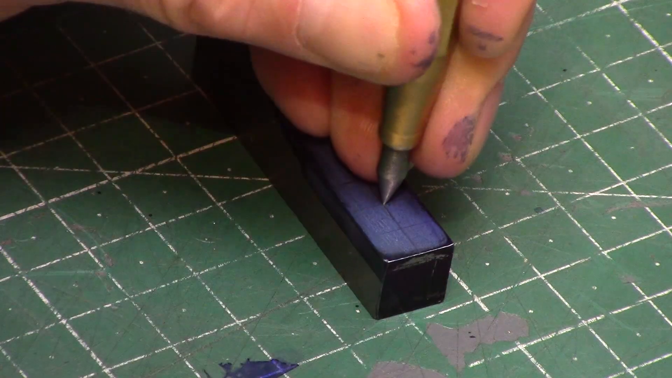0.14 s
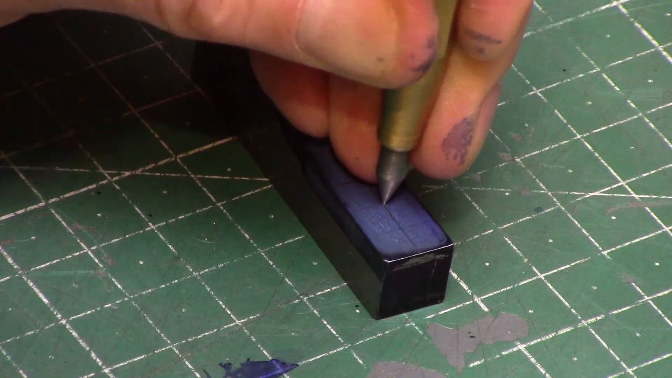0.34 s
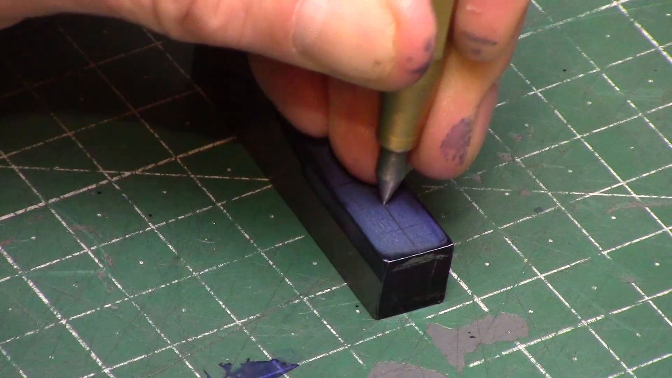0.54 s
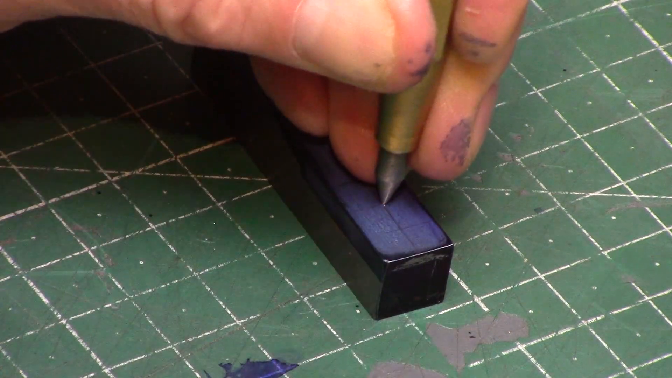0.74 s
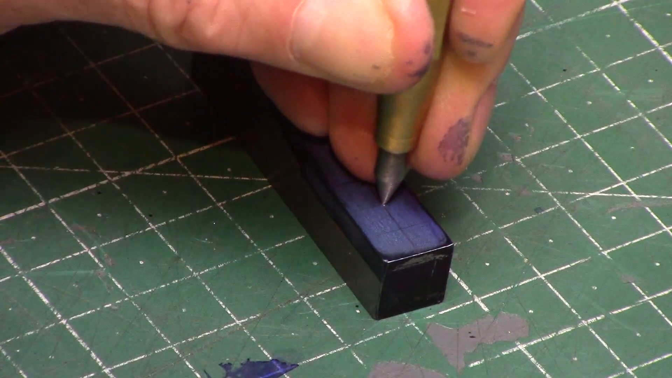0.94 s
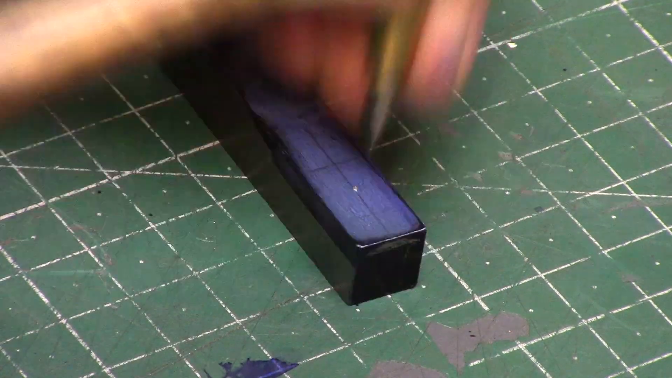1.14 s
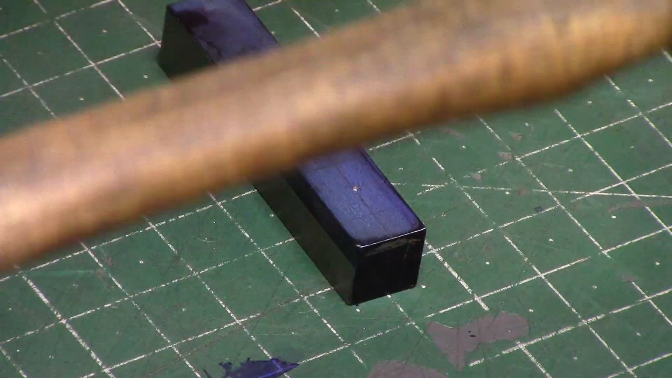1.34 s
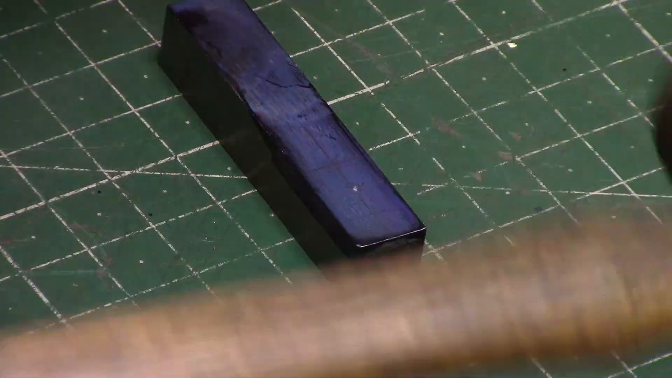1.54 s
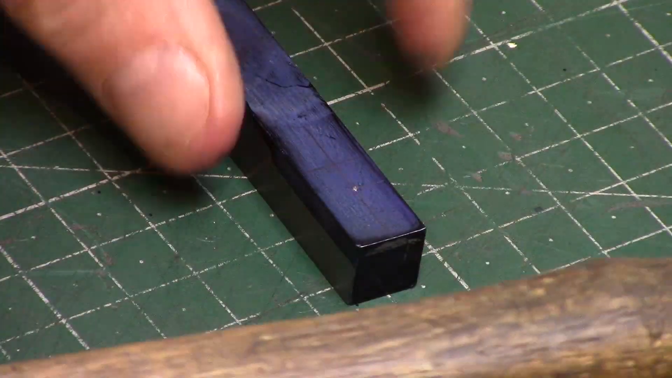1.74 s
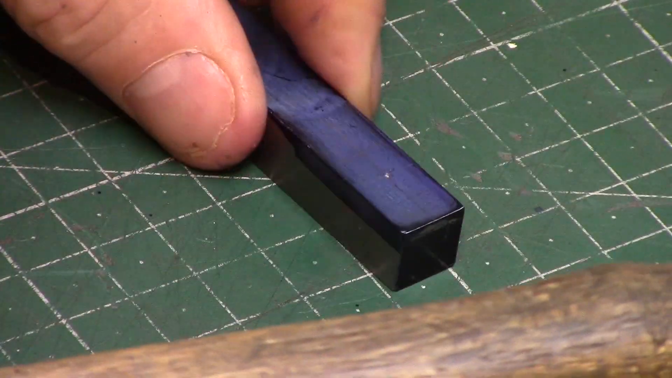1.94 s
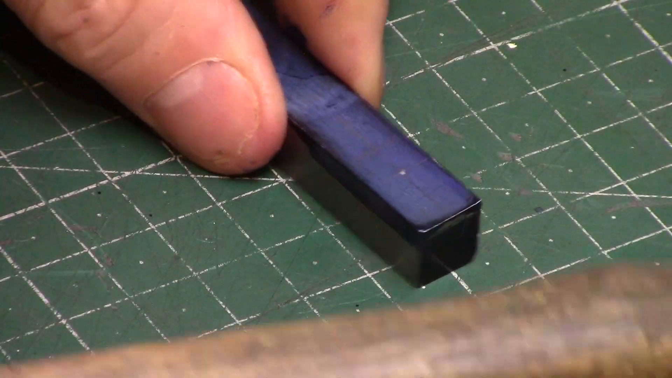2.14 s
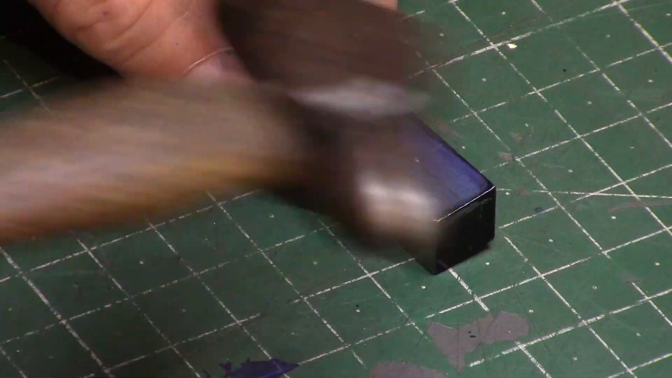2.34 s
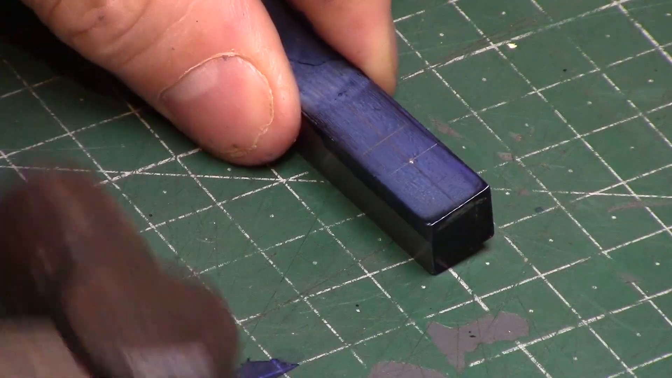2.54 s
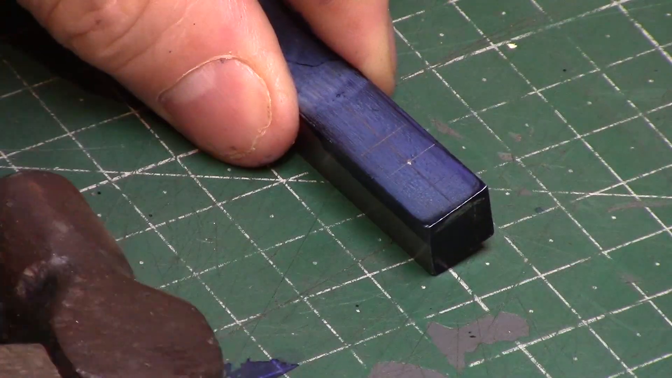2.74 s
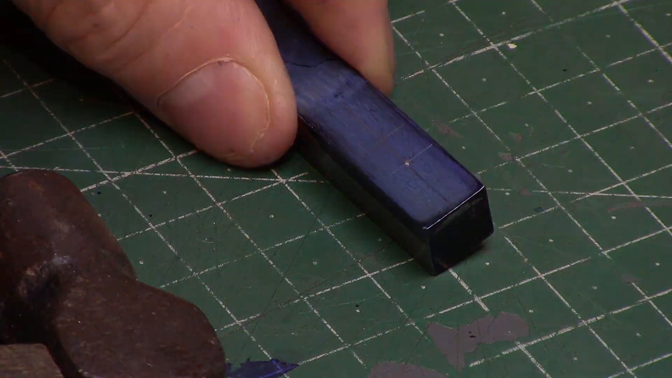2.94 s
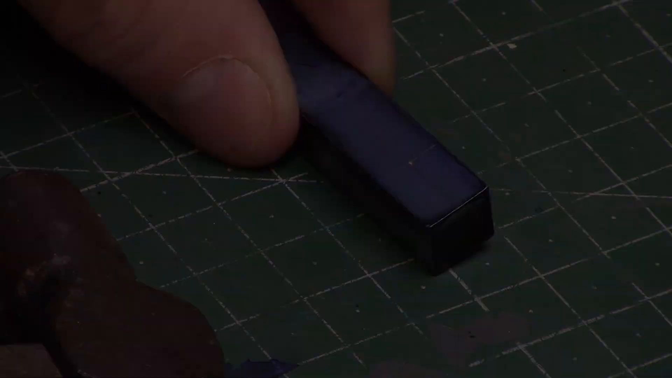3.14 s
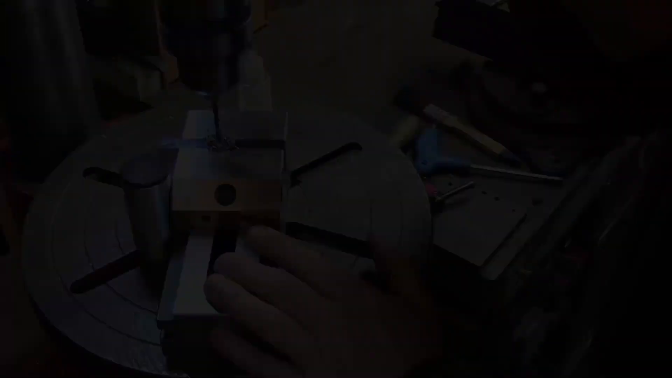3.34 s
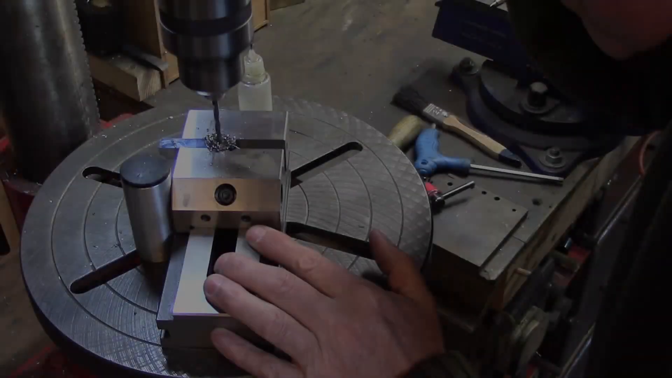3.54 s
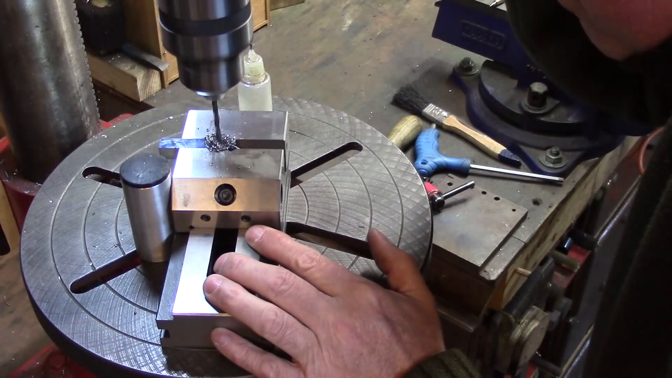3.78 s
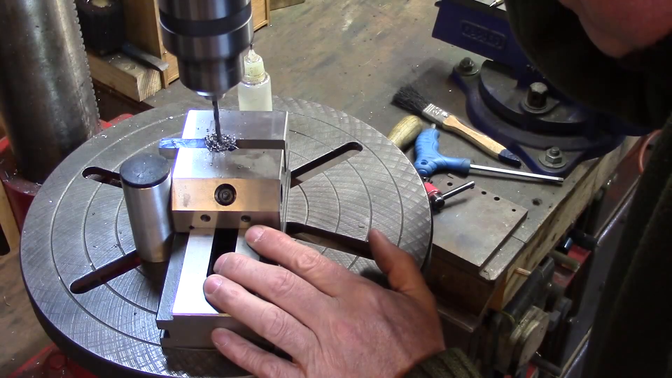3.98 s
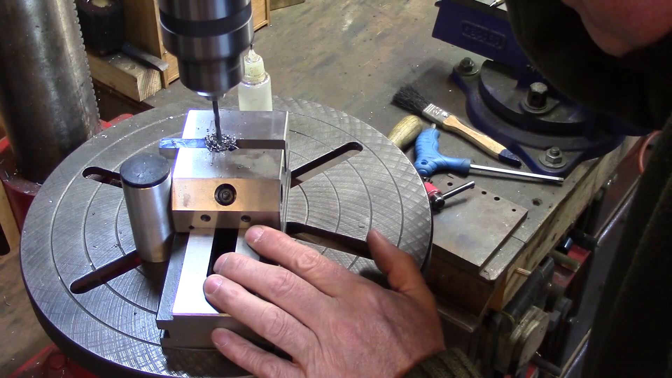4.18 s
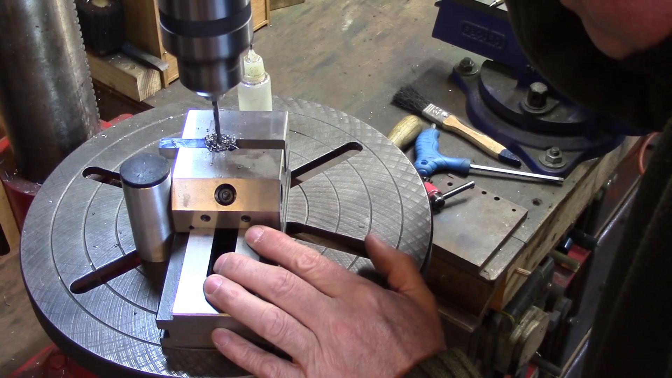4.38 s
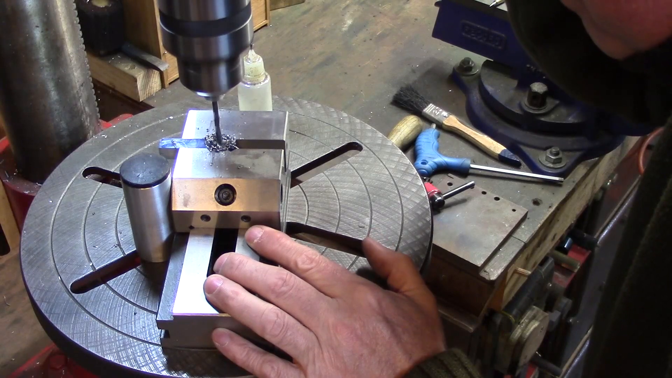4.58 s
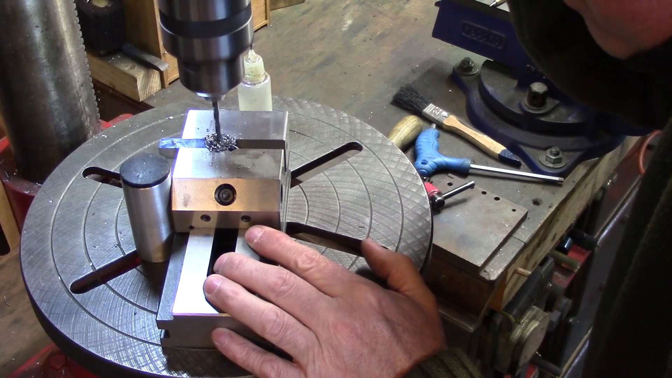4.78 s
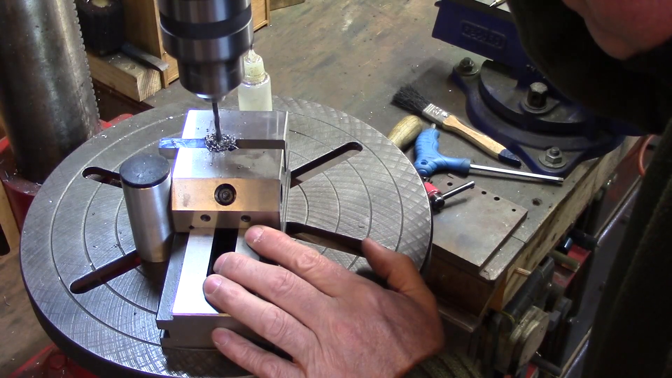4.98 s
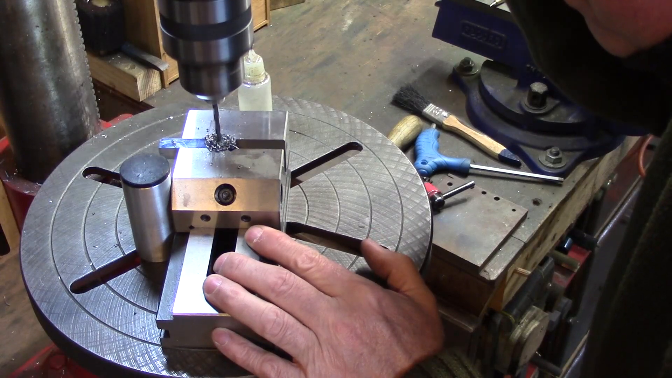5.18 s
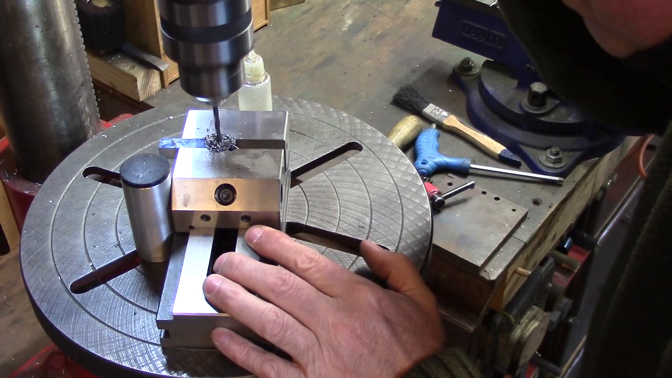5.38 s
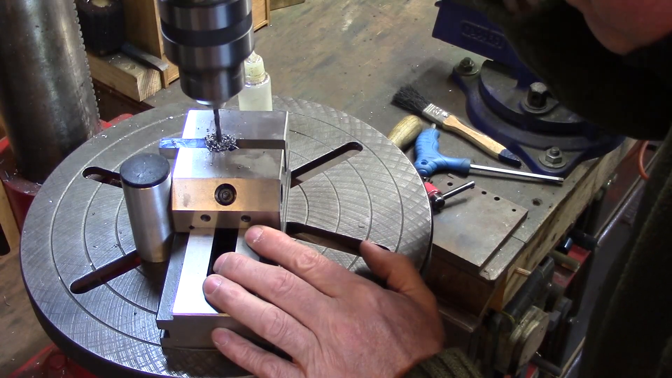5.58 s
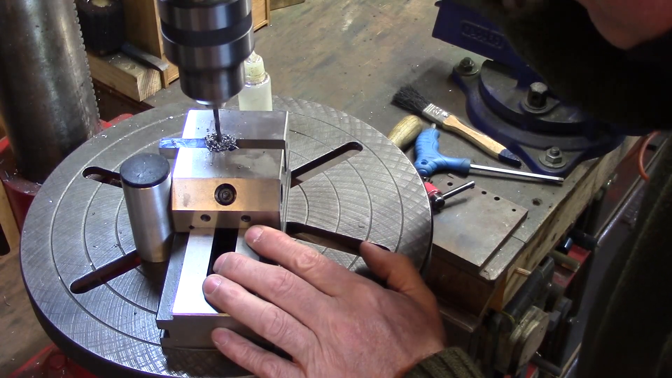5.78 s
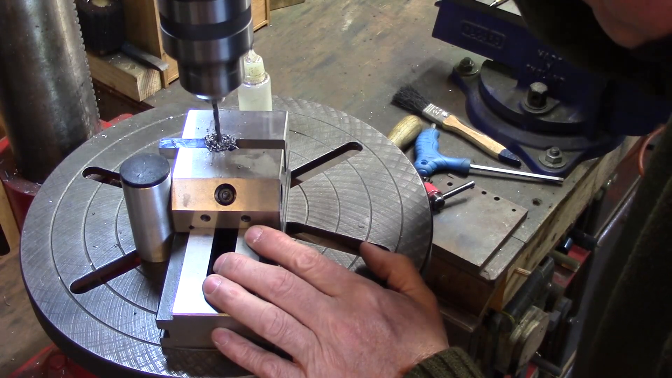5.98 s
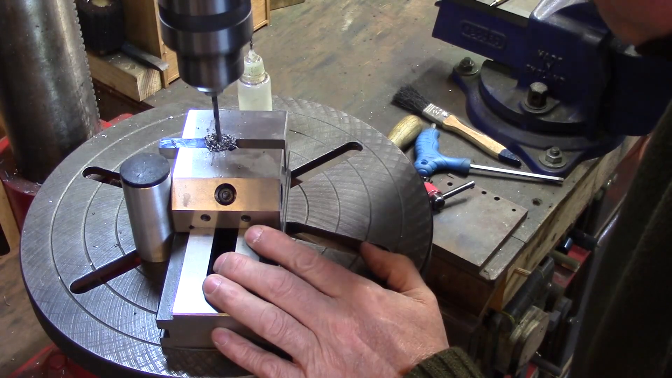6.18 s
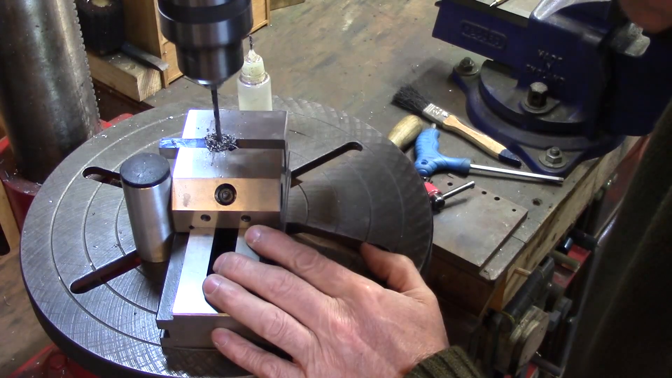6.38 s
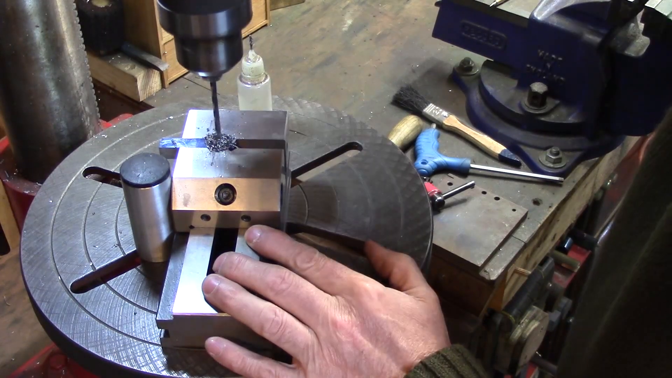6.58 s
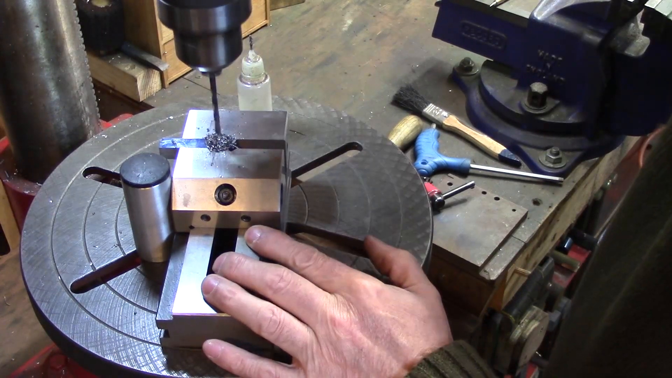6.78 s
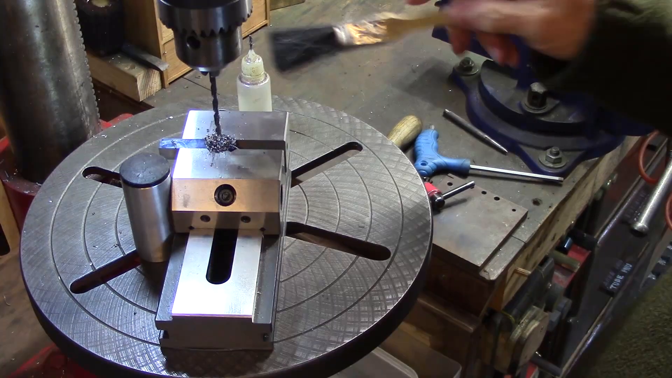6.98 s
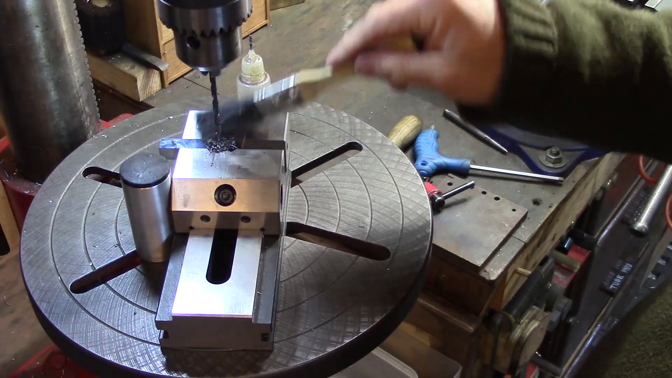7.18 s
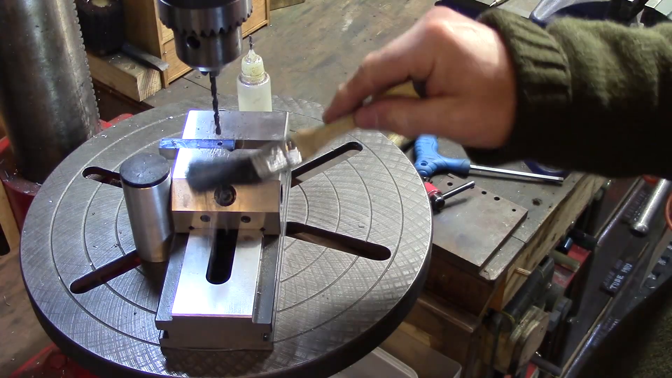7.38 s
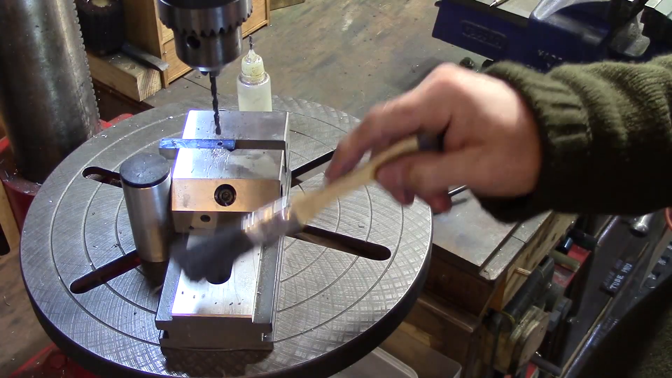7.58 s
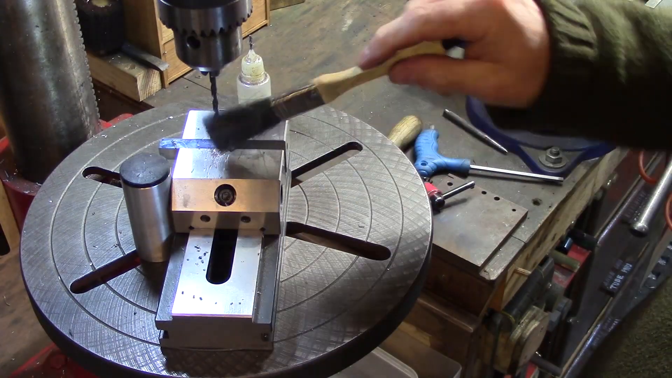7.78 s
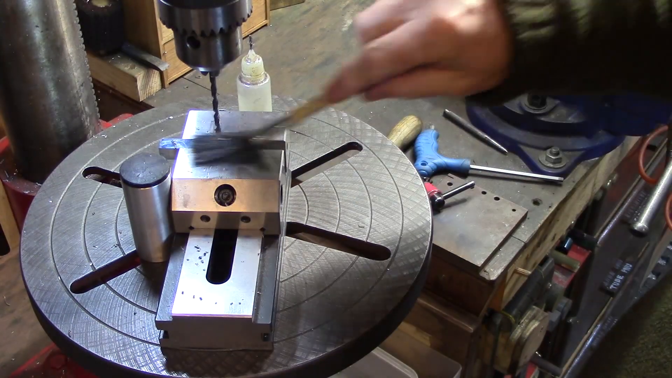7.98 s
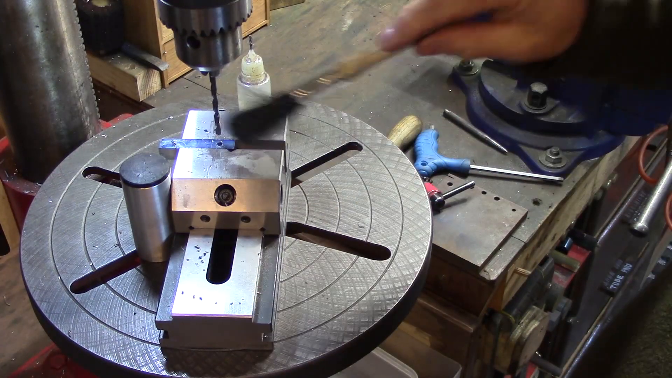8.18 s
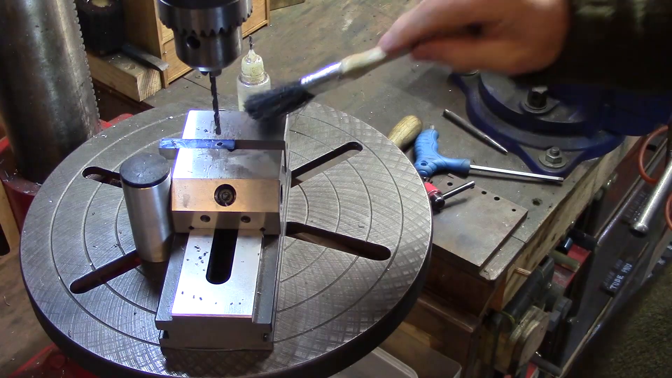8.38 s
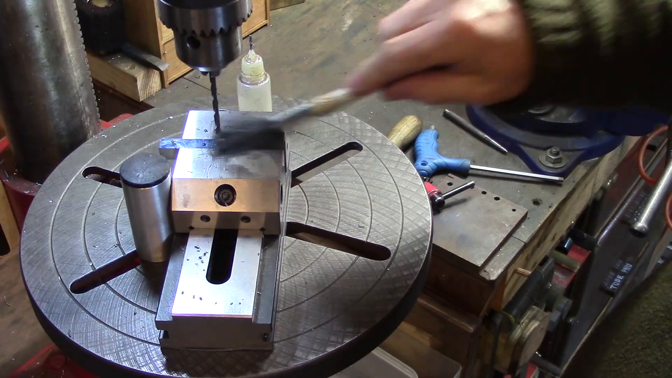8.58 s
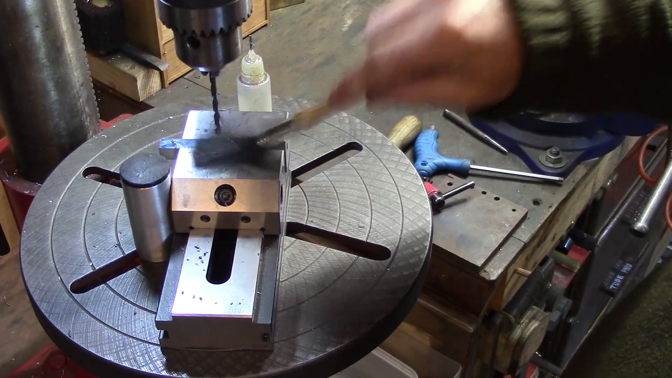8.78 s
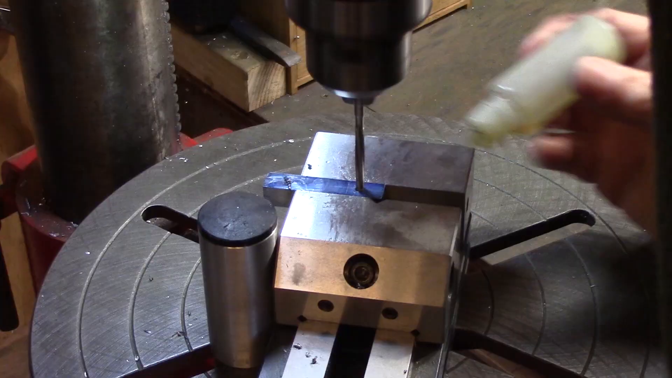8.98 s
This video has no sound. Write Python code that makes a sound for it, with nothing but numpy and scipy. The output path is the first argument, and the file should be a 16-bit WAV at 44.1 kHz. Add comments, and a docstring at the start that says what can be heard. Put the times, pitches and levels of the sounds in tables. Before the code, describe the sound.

One sharp hammer blow and a heavy bench knock, followed by a rattling pillar drill that fades, then brushing and clinking on a steel vice.

```python
"""Centre punch, pillar drill and brush

In a quiet workshop a hammer drives a centre punch into a steel bar on a wooden bench and is laid down.
The sound cuts to a pillar drill, its belt rattling the guard, and fades out. Then a brush sweeps
swarf off a vice. A close microphone pair with a quick limiter hears it all."""
import sys
import numpy as np
from scipy import signal
from scipy.fft import rfft, irfft, next_fast_len
from scipy.io import wavfile

SR = 44100
rng = np.random.default_rng(int(sys.argv[2]) if len(sys.argv) > 2 else 0)


def generate_wav(signal):
    """Clip the signal to [-1, 1] and save it as 16-bit WAV at the path in sys.argv[1]."""
    frames = np.transpose(np.atleast_2d(signal))
    scaled = np.clip(frames, -1, 1) * 32767
    pcm = np.round(scaled).astype(np.int16)
    wavfile.write(sys.argv[1], SR, pcm)


N = 398223

DRILL_IN_S, DRILL_OUT_S, BRUSH_IN_S = 3.61, 7.478, 7.511
# Bench top modes. Each row: frequency in Hz, level in dB, t60 in seconds.
BENCH_MODES = [(111, -17.5, 0.034), (159, -11.5, 0.061), (225.5, -1.5, 0.042), (261, -7, 0.019),
               (369, -3, .07), (383, -2.5, 0.091), (444, 0, 0.075), (484, 0.5, 0.046), (582, 2.5, 0.048),
               (624, 1.5, .06), (659.4, -5, .05), (810, -13.5, 0.026), (934, -14, .05), (1300, -20, .04)]


def hammer():
    """One hard blow shakes the bench and leaves bar and punch faintly ringing."""
    # Bar and punch. Each row: frequency in Hz, level in dB, t60 in seconds.
    steel_modes = [(3063, -6, .4), (4350, -3, .8), (4420, 0, .8), (4510, -1, .8), (4620, -2, .8),
                   (6137, -1, .6), (8040, -1, .6)]
    blow = knock(db=20, treble_db=-20.5, boom_db=-9.5, clatter_db=2, modes=steel_modes, modes_db=-51,
                 top_hz=9000, length_s=0.9)
    out = np.zeros(N)
    add(out, 0.7385, blow)
    return room_echo(out, echo_db=-42, t60_s=0.42)


def knock(db, treble_db, boom_db, clatter_db, modes, modes_db, top_hz, length_s):
    """The bench thuds and booms under a crack, clatter and the ring of the thing struck."""
    # Frame and room answering the thud. Each row: frequency in Hz, density in dB.
    boom_spectrum = [(60, -28), (110, -12.5), (190, -7.5), (250, 2), (330, -8.5), (560, 0), (750, -12.5),
                     (1000, -18.5), (1400, -50.5)]
    # Loose things and near walls. Each row: frequency in Hz, density in dB.
    clatter_spectrum = [(600, -25), (950, 0), (1400, -3), (2000, -11.5), (3300, -10), (6000, -14),
                        (10500, -18.5), (12000, -29), (14500, -32), (16000, -51.5)]
    t = np.arange(round(length_s * SR)) / SR
    thud = ring(BENCH_MODES, t, spread_db=-4) * rise(t, 0.0011)
    boom = gain_of(boom_db) * dying_noise(boom_spectrum, len(t)) * rise(t, 0.0099)
    crack = noise(clatter_spectrum, len(t)) * np.exp(-t / 0.0028)
    clatter = gain_of(clatter_db) * dying_noise(clatter_spectrum, len(t))
    clack = gain_of(modes_db) * ring(modes, t, spread_db=5.5) * rise(t, 0.00066)
    treble = signal.lfilter(*signal.butter(3, top_hz, fs=SR), crack + clatter + clack)
    return gain_of(db) * (thud / abs(thud).max() + boom + gain_of(treble_db) * treble)


def drill():
    """Bearings and belt roar, the head rings, the motor hums and the bit squeaks once."""
    # Bearing and belt roar. Each row: frequency in Hz, density in dB.
    roar_spectrum = [(26, -50), (45, -11), (68, -14), (99, 0), (284, -1), (580, 2), (971, -8), (1340, -3),
                     (2080, -13), (3400, -21), (7470, -27.5), (9090, -38.5), (11100, -35), (14100, -78),
                     (16000, -73)]
    # Head and guard resonances. Each row: frequency in Hz, width in Hz, level in dB.
    head_modes = [(144.6, 16, -18), (337, 14, -27), (452.6, 15, -16.5), (575.5, 25, -18),
                  (652.3, 27, -19.5), (789.4, 11, -24), (905, 6.9, -23), (1159, 35, -22),
                  (1377, 6.8, -21.5), (1589, 20, -26), (1927, 51, -22), (2366, 20, -27), (2640, 32, -27.5),
                  (2985, 54, -29), (3402, 43, -29)]
    # Mains hum and belt orders. Each row: frequency in Hz, relative level in dB.
    hum_tones = [(66.9, -27.5), (99.8, -15.5), (199.5, -18)]
    running_db, sag_db_per_s, fade_start_s = -35, -0.55, 6.72
    t = np.arange(DRILL_IN_S, DRILL_OUT_S, 1 / SR)
    fade = np.minimum((DRILL_OUT_S - t) / (DRILL_OUT_S - fade_start_s), 1) ** 1.04
    level = gain_of(running_db + sag_db_per_s * (t - t[0])) * fade
    rattle, jolt = belt_guard(t, level)
    head = resonant_noise(head_modes, len(t))
    hum = sum(gain_of(db) * np.sqrt(2) * np.sin(2 * np.pi * (hz * t + rng.random()))
              for hz, db in hum_tones)
    roar = gain_of(-5.5) * noise(roar_spectrum, len(t))
    out = np.zeros(N)
    add(out, DRILL_IN_S, rattle + (level + jolt) * (roar + head) + level * hum)
    squeak_start_s, squeak_length_s, squeak_hz = 4.598, 0.048, 12000
    age = np.arange(round(squeak_length_s * SR)) / SR
    squeak = np.sin(2 * np.pi * squeak_hz * age) * np.hanning(len(age))
    add(out, squeak_start_s, gain_of(-51) * squeak)
    return out


def belt_guard(t, level):
    """The guard ticks each pulley turn, at times rattling hard. Returns sound and jolt to the casting."""
    # Hard rattles. Each row: time in seconds, treble peak in dB, low part against it in dB.
    rattles = [(3.6117, -50, 4.5), (3.6437, -36, 0), (3.705, -36.5, -1), (3.7334, -38.5, 0.5),
               (3.8013, -43.5, -2.5), (3.8357, -44.5, 1.5), (3.8975, -41.5, 2), (3.9394, -35.5, -2.5),
               (3.997, -32.5, -4.5), (4.02, -36, -0.5), (4.087, -34.5, -6), (4.1126, -39, 1),
               (4.1938, -40, 3), (4.2345, -34.5, -0.5), (4.2624, -37, -1), (4.2944, -38.5, 1),
               (4.3515, -40.5, 2), (4.3794, -41.5, 0.5), (4.4303, -37.5, 2.5), (4.4674, -40.5, 4.5),
               (4.5264, -37, 3), (4.6483, -40, 2), (4.6828, -38.5, -4), (4.702, -38, 2), (4.7321, -44, -3),
               (4.7641, -42, 2), (4.7914, -35.5, 2), (4.8654, -36.5, 0), (4.88, -34.5, 0),
               (4.9084, -39.5, -3), (4.9686, -34.5, -1), (4.994, -38.5, 0), (5.025, -36, 0.5),
               (5.0539, -37, -4), (5.125, -43, 2), (5.1562, -40, 2.5), (5.228, -34, -1), (5.29, -33, -4),
               (5.3782, -43, 8), (5.468, -38.5, 1), (5.5243, -33.5, -4), (5.569, -39.5, 1.5),
               (5.5834, -38.5, 1.5), (5.6401, -43.5, 4.5), (5.67, -33, -5), (5.721, -42.5, 2.5),
               (5.7586, -32, -4.5), (5.8297, -36.5, -0.5), (5.906, -43.5, 3.5), (6.022, -40, -3),
               (6.0811, -37.5, -0.5), (6.112, -43.5, 1), (6.1786, -42, 2), (6.25, -40.5, 2),
               (6.2845, -38, -1), (6.3375, -34, 0), (6.4228, -36.5, -1.5), (6.4925, -38.5, 2.5),
               (6.5266, -36.5, 2), (6.611, -37.5, 0.5), (6.6394, -44.5, 0), (6.697, -33, -8),
               (6.761, -39.5, 0.5), (6.871, -45, 3.5), (6.9341, -47.5, 0.5), (6.9631, -45.5, 4),
               (6.9934, -50, -1), (7.0414, -48, -1), (7.0754, -45.5, 0), (7.1342, -44, -6),
               (7.227, -51, 0.5), (7.2614, -57.5, 2), (7.3133, -53.5, 3)]
    pulley_hz, jitter_s = 33.9, 0.0023
    high_crest_db, low_crest_db = 11.5, 6
    rebound_s, rebound_db = 0.016, -6.5
    high_hits, low_hits = np.zeros((2, len(t)))
    turns_s = np.arange(0.02, t[-1] - t[0] - 0.02, 1 / pulley_hz)
    timing, force = rng.standard_normal((len(turns_s), 2)).T
    at = np.round((turns_s + jitter_s * timing) * SR).astype(int)
    high_hits[at] = level[at] * gain_of(-24 + 4.6 * force)
    low_hits[at] = gain_of(-1) * high_hits[at]
    for start_s, db, low_db in rattles:
        at = max(round((start_s - t[0]) * SR), 0) + np.array([0, round(rebound_s * SR)])
        pair_db = db + np.array([0, rebound_db])
        high_hits[at] += gain_of(pair_db - high_crest_db)
        low_hits[at] += gain_of(pair_db + low_db - low_crest_db)
    # Shaken guard. Each row: frequency in Hz, density in dB.
    guard_spectrum = [(500, -7), (900, -3), (2000, 1.5), (3500, 2), (5000, -9), (7500, -16), (8500, -21),
                      (11500, -21), (13000, -29), (15000, -33), (16000, -44)]
    hiss = rng.standard_normal(len(t))
    chips = grains(len(t), per_s=1500, spread_db=5)
    shake = colour(hiss + 0.5 * chips, guard_spectrum)
    dull = lowpass(shake, 4500)
    high = unit_rms(shake - dull) * hit_envelope(high_hits, t60_s=0.079)
    low = unit_rms(dull) * hit_envelope(low_hits, t60_s=0.23)
    return high + low, 1.7 * hit_envelope(low_hits, t60_s=0.13)


def hit_envelope(hits, t60_s):
    """Amplitude of decaying hits that add in power."""
    t = np.arange(6000) / SR
    power = gain_of(-120 * t / t60_s) * (1 + 0.56 * np.exp(-t / 0.036)) * rise(t, 0.0012)
    return np.sqrt(abs(signal.oaconvolve(hits ** 2, power)[:len(hits)]))


def bench_knocks():
    """Tools knock on the bench; harder contact is brighter."""
    # Each row: start in seconds, level in dB, treble against the thud in dB.
    knocks = [(0.232, -55.5, 4), (0.414, -59, 15.5), (0.425, -30.5, -16), (0.449, -49, -4),
              (0.461, -35.5, -5), (0.861, -33, -4), (0.897, -39, -6.5), (1.067, -58, -1),
              (1.145, -42.5, -16), (1.172, -41, -18), (1.18, -37.5, -17), (1.935, -44.5, -15),
              (1.947, -43, -9.5), (1.955, -39.5, -13), (2.229, -49, -16.5), (2.254, -51, -21),
              (2.657, -5, -16.5), (2.676, -24, -10), (2.816, -27, -23.5), (2.847, -32.5, -18),
              (2.878, -53, -19), (3.185, -54, 4), (3.244, -55, 4), (3.252, -48, 6)]
    # Wooden handle. Each row: frequency in Hz, level in dB, t60 in seconds.
    handle_modes = [(1356, -6, 0.042), (1714, -3, 0.13), (2230, 10.5, 0.024), (2630, 2, 0.039),
                    (3018, -1, 0.052), (3980, -7.5, 0.032)]
    out = np.zeros(N)
    for start_s, db, treble_db in knocks:
        add(out, start_s, knock(db, treble_db, boom_db=-15.5, clatter_db=-10, modes=handle_modes,
                                modes_db=2.5, top_hz=3480 + 101.5 * (db + 60), length_s=0.3))
    return out


def vice_taps():
    """Ferrule and swarf tap the vice: it clinks, a chip ticks, the drill table thuds."""
    # Each row: start in seconds, clink peak in dB, tick and thud against it in dB.
    taps = [(7.7092, -45, -5, -7), (7.754, -43, -9, -26), (7.798, -50, 12, -29), (7.835, -46, 5, -11),
            (7.859, -33.5, -17, -24), (7.8827, -32.5, -2.5, -40), (7.898, -36, -14, -33),
            (7.9255, -23, -13, -14), (7.9298, -13, -19, -14.5), (7.9413, -27, -3.5, -3.5),
            (7.95, -22, -16, -23), (7.96, -30, -17, -15), (7.9908, -40, -3, -24), (8.011, -39, -7, -21),
            (8.0438, -37.5, -4, -24), (8.0767, -39.5, 1.5, -28), (8.094, -36.5, -4, -19),
            (8.1214, -42.5, -3, -3), (8.162, -46, 0.5, -24), (8.191, -48, 0, -16), (8.2483, -42.5, -4, -24),
            (8.291, -42, -15, -6), (8.3454, -48, 2, 1), (8.442, -47, -9, -22), (8.5113, -53, 2, -13),
            (8.56, -36, -20, -26), (8.6195, -46.5, 1, 3), (8.66, -53, 5, -1), (8.4587, -50, 1, -25),
            (8.777, -43.5, -1, -40), (8.8019, -51, -1, -23), (8.8602, -40, -3.5, -2)]
    # Chip tick. Each row: frequency in Hz, density in dB.
    swarf_spectrum = [(3500, -5.5), (6000, -4.5), (8000, -4.5), (10000, 2), (12000, -5), (16000, -13)]
    # Vice and drill table. Each row: frequency in Hz, level in dB, t60 in seconds.
    vice_modes = [(924, -21, 0.17), (1133, -7, 0.035), (1374, -3, 0.02), (1597, -6.5, 0.042),
                  (1785, -2.5, 0.049), (1940, -2.5, 0.028), (2243, 2, 0.049), (2430, -2, 0.021),
                  (2670, 0.5, 0.021), (3220, -7.5, 0.025), (4040, -21, 0.046), (4500, -18.5, 0.055)]
    table_modes = [(133, -16, 0.14), (157, -6.5, 0.13), (220, -0.5, 0.091), (292, 0, 0.077),
                   (378, 0.5, 0.089), (467, -3, 0.089)]
    t = np.arange(8000) / SR
    out = np.zeros(N)
    for start_s, db, tick_db, thud_db in taps:
        tick = noise(swarf_spectrum, len(t)) * (np.exp(-t / 0.0015) + 0.47 * np.exp(-t / 0.014))
        thud = ring(table_modes, t, spread_db=3) * rise(t, 0.003)
        clink = ring(vice_modes, t, spread_db=3) * rise(t, 0.0003)
        add(out, start_s, gain_of(db) * (clink + gain_of(tick_db) * tick + gain_of(thud_db) * thud))
    return out


def brush():
    """Bristles snap over the steel at many pitches, above a low rub."""
    # Each row: start and length in seconds, bristle and rub levels in dB.
    strokes = [(7.548, .09, -60, -68), (7.695, 0.2, -47, -50), (7.879, 0.16, -54.5, -49),
               (8.012, 0.19, -51, -49), (8.163, 0.32, -60, -58.5), (8.33, 0.19, -57.5, -58.5),
               (8.495, 0.17, -63, -60.5), (8.589, 0.16, -62, -58), (8.767, .03, -52, -62),
               (8.84, 0.14, -57, -56.5)]
    # Bristles on steel. Each row: frequency in Hz, density in dB.
    bristle_spectrum = [(290, -22), (500, -8), (649, -14.5), (919, -3.5), (1230, -17), (1460, -9),
                        (2040, -9), (9090, -3), (9920, -5), (13500, -11.5), (16000, -16)]
    size = N - round(BRUSH_IN_S * SR)
    bright_level, rub_level = np.zeros((2, size))
    for start_s, length_s, bright_db, rub_db in strokes:
        push = swell(length_s, peak_share=0.3)
        add(bright_level, start_s - BRUSH_IN_S, gain_of(bright_db) * push)
        add(rub_level, start_s - BRUSH_IN_S, gain_of(rub_db) * push)
    snaps = np.zeros(size)
    for hz in np.geomspace(700, 14000, 12):
        clicks = grains(size, per_s=260, spread_db=4)
        snaps += unit_rms(resonate(clicks, hz, 0.22 * hz)) * np.sqrt(hz)
    bristles = colour(unit_rms(snaps) + 0.78 * rng.standard_normal(size), bristle_spectrum)
    rub = lowpass(bristles, 3500)
    out = np.zeros(N)
    add(out, BRUSH_IN_S, bright_level * unit_rms(bristles - rub) + rub_level * unit_rms(rub))
    return out


def slides():
    """Fingers, bar and handle hiss over the mat; friction excites the bench modes."""
    # Each row: start and length in seconds, hiss and scrape levels in dB.
    moves = [(0.039, 0.16, -68, -76), (1.302, 0.49, -69, -67.5), (2.17, 0.14, -77, -62.5),
             (2.289, 0.12, -62, -59)]
    # Skin friction. Each row: frequency in Hz, density in dB.
    skin_spectrum = [(1180, -33), (2000, -8), (4120, -5.5), (5210, -13), (7570, -5.5), (10400, -9),
                     (16000, -22)]
    out = np.zeros(N)
    for start_s, length_s, hiss_db, scrape_db in moves:
        push = swell(length_s, peak_share=0.31)
        grit = grains(len(push), per_s=830, spread_db=-0.5)
        scrape = sum(gain_of(db) * resonate(grit, hz, width_hz=28) for hz, db, _ in BENCH_MODES[2:11])
        hiss = noise(skin_spectrum, len(push))
        add(out, start_s, push * (gain_of(hiss_db) * hiss + gain_of(scrape_db) * unit_rms(scrape)))
    return out


def faint_tones():
    """A thin squeal in the second slide; later a low hum swells briefly in the room."""
    # Each: start and length in seconds, frequency and width in Hz, level in dB.
    squeal = (1.33, .3, 2400, 80, -71)
    drone = (3, 1.5, 69, 14, -66)
    out = np.zeros(N)
    for start_s, length_s, hz, width_hz, db in (squeal, drone):
        push = swell(length_s, peak_share=0.31)
        band = resonate(rng.standard_normal(len(push)), hz, width_hz)
        add(out, start_s, gain_of(db) * push * unit_rms(resonate(band, hz, width_hz)))
    return out


def room_echo(x, echo_db, t60_s):
    """Adds the workshop's diffuse echo."""
    # Echo colour. Each row: frequency in Hz, level in dB.
    echo_spectrum = [(100, 1.5), (400, -2.5), (1000, -3.5), (3000, -5), (6000, -12), (14000, -26.5)]
    t = np.arange(SR // 2) / SR
    tail = noise(echo_spectrum, len(t)) * gain_of(-60 * t / t60_s) * rise(t, 0.012)
    return x + gain_of(echo_db) * signal.oaconvolve(x, tail / np.linalg.norm(tail))[:N]


def stereo_spread(mid):
    """A little diffuse room sound differs between the microphones."""
    # Each row: frequency in Hz, side against mid in dB.
    side_spectrum = [(60, -17), (150, -18.5), (380, -36), (950, -29.5), (2380, -20.5), (5980, -17.5),
                     (15000, -18.5)]
    t = np.arange(1500) / SR
    tail = rng.standard_normal(len(t)) * gain_of(-60 * t / 0.031)
    side = colour(signal.oaconvolve(mid, tail / np.linalg.norm(tail))[:N], side_spectrum)
    return np.array([mid + side, mid - side])


def room_tone():
    """Steady hiss and a faint whine, before and after the drill."""
    # Room and microphone hiss. Each row: frequency in Hz, density in dB.
    hiss_spectrum = [(12, -42), (20, -24), (65, -8.5), (146, -10), (172, -12), (216, -7.5), (328, -9),
                     (542, -11.5), (642, -12.5), (849, -11.5), (1260, -15), (2260, -19.5), (3070, -22.5),
                     (5380, -26.5), (16000, -36.5)]
    # Each row: frequency in Hz, side against mid in dB.
    side_spectrum = [(60, -12.5), (240, -7), (950, -9.5), (3770, -9), (15000, -12.5)]
    t = np.arange(N) / SR
    hiss = noise(hiss_spectrum)
    whine = unit_rms(resonate(rng.standard_normal(N), hz=5670, width_hz=15))
    mid = hiss + gain_of(-22.5) * whine
    side = colour(noise(hiss_spectrum), side_spectrum)
    level = gain_of(-63) * (t < DRILL_IN_S) + gain_of(-60) * (t > BRUSH_IN_S)
    return level * np.array([mid + side, mid - side])


def ring(modes, t, spread_db):
    """Decaying modes, peak 1; where the blow lands sets each one's share."""
    hz, db, t60_s = np.transpose(modes)[:, :, None]
    share, detune, phase = rng.standard_normal((len(modes), 3)).T[:, :, None]
    polarity_cycles = np.arange(len(modes))[:, None] // 2 / 2  # neighbouring pairs swing in opposition
    cycles = hz * (1 + 0.014 * detune) * t + 0.12 * phase + polarity_cycles
    x = (gain_of(db + spread_db * share - 60 * t / t60_s) * np.sin(2 * np.pi * cycles)).sum(0)
    return x / abs(x).max()


def dying_noise(spectrum, size):
    """Noise whose bands each decay at their own rate."""
    # Decay around the bench. Each row: frequency in Hz, t60 in seconds.
    decay_times = [(100, 0.21), (300, 0.15), (600, 0.14), (1000, 0.16), (3000, 0.16), (8000, 0.15),
                   (11000, 0.2), (15000, 0.1)]
    hz, frames_s, bands = signal.stft(noise(spectrum, size), SR, nperseg=256)
    decay = gain_of(-60 * frames_s / value_at(decay_times, hz)[:, None])
    return signal.istft(bands * decay, SR, nperseg=256)[1][:size]


def resonant_noise(modes, size):
    """Noise through narrow, steep resonances, each at its own level."""
    padded = next_fast_len(size)
    bins_hz = np.fft.rfftfreq(padded, 1 / SR)
    power = sum(gain_of(2 * db) / width_hz / (1 + (2 * (bins_hz - hz) / width_hz) ** 2) ** 2
                for hz, width_hz, db in modes)
    x = irfft(rfft(rng.standard_normal(padded)) * np.sqrt(power), padded)[:size]
    return unit_rms(x) * np.linalg.norm([gain_of(db) for _, _, db in modes])


def grains(size, per_s, spread_db):
    """Sparse clicks of uneven size, rms 1."""
    strength, chance, polarity = rng.random((size, 3)).T
    height = gain_of(spread_db * np.minimum(-np.log(strength + 1e-9), 5))
    return unit_rms(height * (chance < per_s / SR) * np.sign(polarity - 0.5))


def resonate(x, hz, width_hz):
    """One-pole resonance of gain 1."""
    r = np.exp(-np.pi * width_hz / SR)
    return 2 * signal.lfilter([1 - r], [1, -r * np.exp(2j * np.pi * hz / SR)], x).real


def noise(spectrum, size=N):
    return unit_rms(colour(rng.standard_normal(size), spectrum))


def colour(x, spectrum):
    size = next_fast_len(len(x))
    gain = gain_of(value_at(spectrum, np.fft.rfftfreq(size, 1 / SR)))
    return irfft(rfft(x, size) * gain, size)[:len(x)]


def value_at(table, hz):
    table_hz, values = np.transpose(table)
    return np.interp(np.log(hz + 1), np.log(table_hz + 1), values)


def lowpass(x, hz):
    return signal.sosfiltfilt(signal.butter(3, hz, fs=SR, output="sos"), x)


def smooth(x, tau_s):
    r = np.exp(-1 / (tau_s * SR))
    return signal.lfilter([1 - r], [1, -r], x)


def swell(length_s, peak_share):
    """Smooth rise and fall, loudest at peak_share of its length."""
    progress = np.arange(round(length_s * SR)) / (length_s * SR)
    return np.sin(np.pi * progress ** (np.log(0.5) / np.log(peak_share)))


def rise(t, tau_s):
    return 1 - np.exp(-t / tau_s)


def gain_of(db):
    return 10 ** (np.asarray(db) / 20)


def unit_rms(x):
    return x / np.sqrt(np.mean(x ** 2) + 1e-20)


def add(mix, start_s, sound):
    part = mix[round(start_s * SR):][:len(sound)]
    part += sound[:len(part)]


def scene():
    """All close sources over the room tone."""
    blow = hammer()
    handling = bench_knocks() + slides() + faint_tones() + brush() + vice_taps()
    close = blow + room_echo(handling, echo_db=-20.5, t60_s=0.22) + drill()
    return stereo_spread(close) + room_tone()


def record(dry):
    """The microphones drop deep bass; the blow clips until the limiter catches it."""
    threshold_db, release_db_per_s, ceiling, top_hz = -8.5, 370, 0.62, 16000
    heard = signal.sosfilt(signal.butter(3, 80, "high", fs=SR, output="sos"), dry)
    power_db = 10 * np.log10(smooth((heard ** 2).mean(0), tau_s=0.0064) + 1e-12)
    release_db = np.arange(N) * release_db_per_s / SR
    held_db = np.maximum.accumulate(power_db + release_db) - release_db
    over_db = np.maximum(held_db - threshold_db, 0)
    limited = heard / gain_of(smooth(over_db, tau_s=0.00046))
    clipped = ceiling * np.tanh((abs(limited) / ceiling) ** 3) ** (1 / 3) * np.sign(limited)
    # The output stage passes no sub-bass.
    output = signal.sosfilt(signal.butter(2, 55, "high", fs=SR, output="sos"), clipped)
    treble_cut = signal.firwin(511, top_hz, window=("kaiser", 9), fs=SR)
    return signal.oaconvolve(output, treble_cut[None], "same")


dry = scene()
out = record(dry)
generate_wav(out)
```